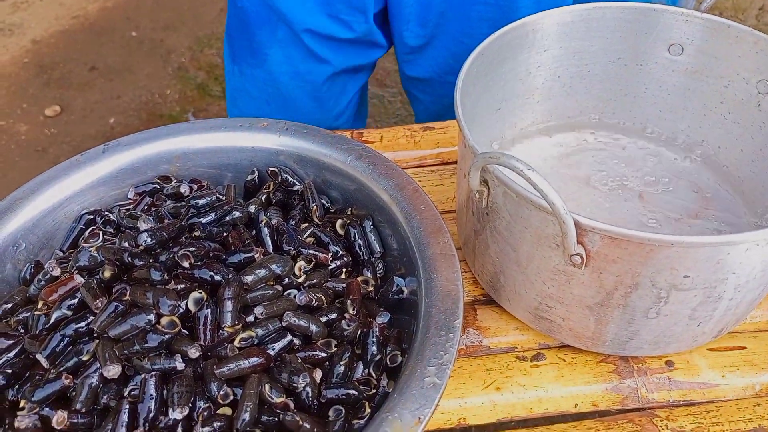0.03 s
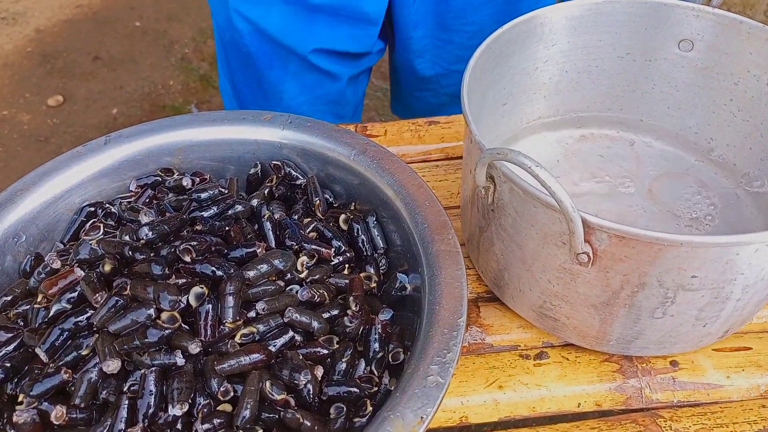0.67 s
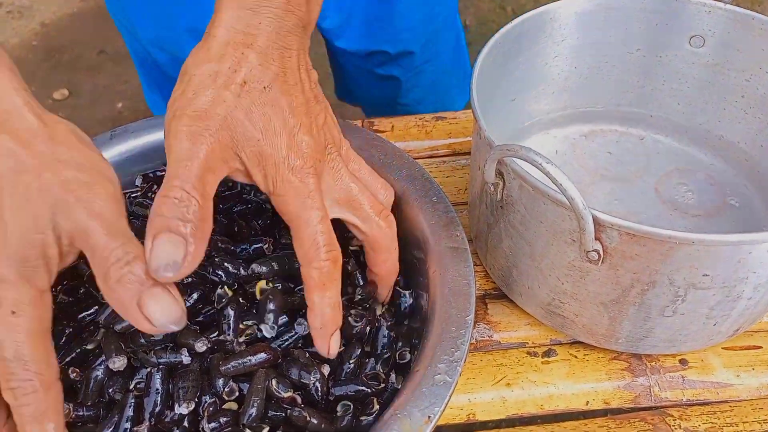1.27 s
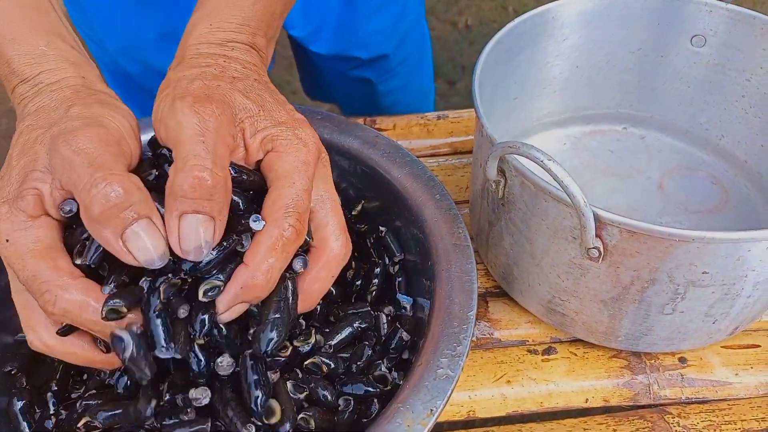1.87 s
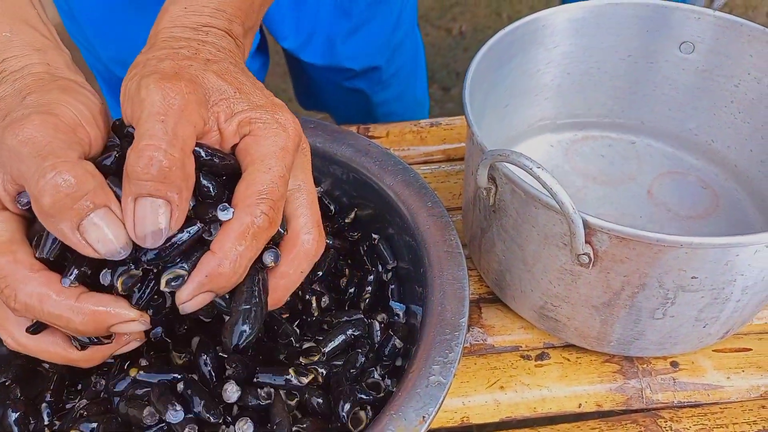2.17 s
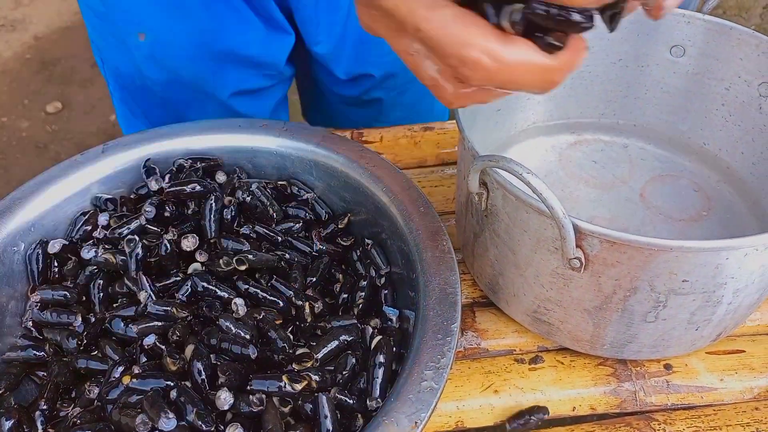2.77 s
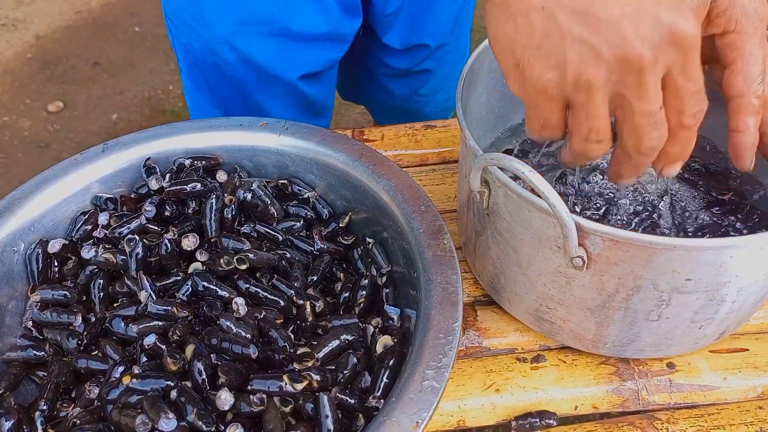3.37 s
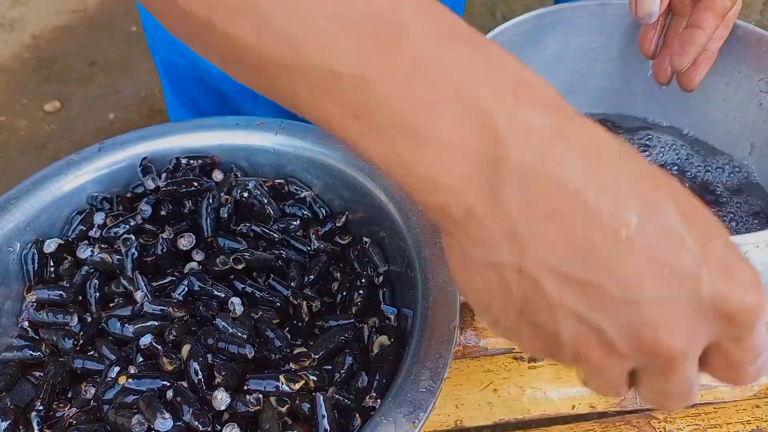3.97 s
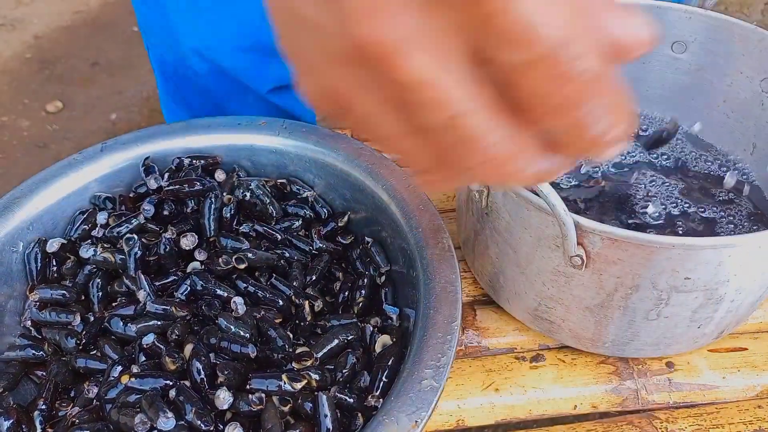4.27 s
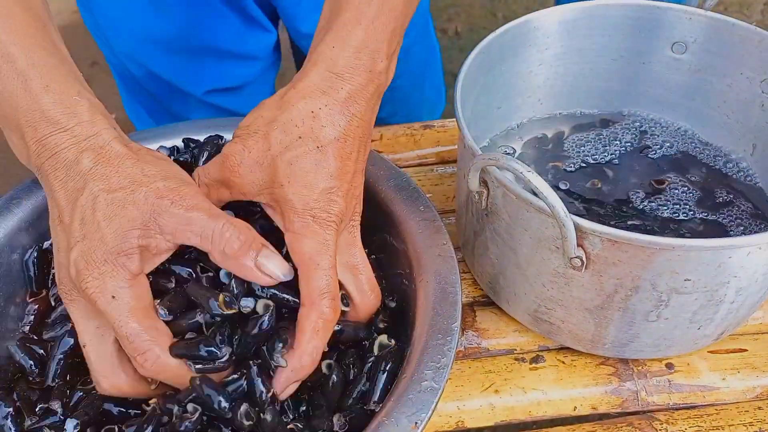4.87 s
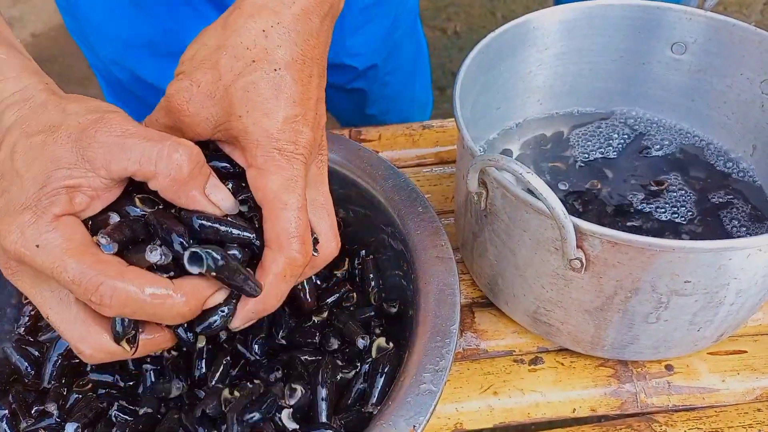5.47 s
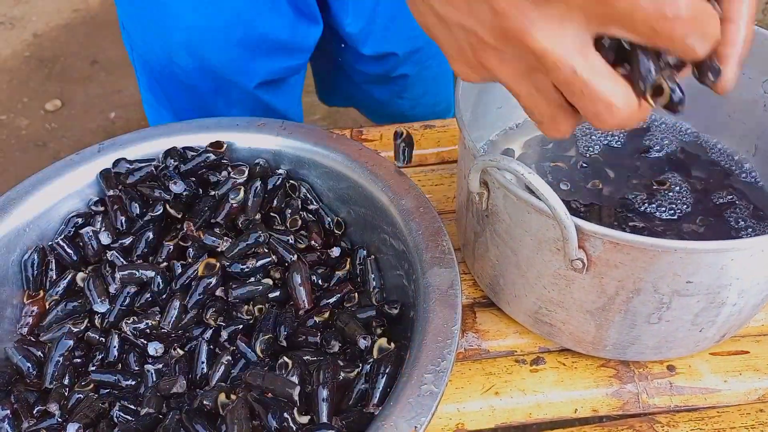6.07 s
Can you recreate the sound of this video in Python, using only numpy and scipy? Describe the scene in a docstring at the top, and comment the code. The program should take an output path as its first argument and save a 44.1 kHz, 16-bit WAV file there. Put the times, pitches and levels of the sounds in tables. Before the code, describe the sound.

Wet snail shells crunch and clink in a metal basin, then splash into a pot of water, while a chick peeps faintly.

```python
"""Scooping snail shells in a yard

Outdoors, one microphone close to a bamboo table. Two hands scoop wet snail shells out of a metal basin:
they grind, click and set its wall ringing. Dropped into a pot of water they slosh and plop; strays fall
back, and bumps make the hollow slats knock and rattle. Farther off a chick peeps, a hen clucks twice
and a bird whistles faintly over the low rumble of the yard."""
import sys
import numpy as np
from scipy import signal
from scipy.fft import rfft, irfft
from scipy.io import wavfile
from scipy.ndimage import uniform_filter1d, minimum_filter1d

SR = 44100
rng = np.random.default_rng(int(sys.argv[2]) if len(sys.argv) > 2 else 0)


def unload_audio(sound):
    """Save the sound as a 16-bit wav file, at the path given as the first command line argument."""
    columns = np.transpose(np.atleast_2d(sound))
    # keep every value between -1 and 1, then stretch to whole-number steps
    steps = np.round(np.clip(columns, -1, 1) * 32767)
    wavfile.write(sys.argv[1], SR, steps.astype(np.int16))


N = 270333
TIME = np.arange(N) / SR
HIT_TIME = TIME[:SR // 3]

# Levels in the tables are relative; each source adds its own gain.
# spectrum of the open yard (frequency [Hz], level [dB])
YARD_SPECTRUM = [(25, -12), (45, -2.5), (75, 6.5), (150, 1), (280, -12), (450, -15.5), (1300, -17.5),
                 (2700, -17.5), (4200, -23.5), (5900, -36.5), (7400, -25.5), (9000, -18), (10200, -32),
                 (15500, -43)]
# calls of the far bird (start [s], level [dB])
WHISTLES = [(0.099, -72), (0.607, -64), (3.92, -61.5)]
# course of one call (time from its start [s], pitch before transposing [Hz], level [dB])
WHISTLE_SHAPE = [(0.0, 4550, -18), (0.025, 4470, 6), (0.06, 5100, -6), (0.1, 5560, -5), (0.13, 6550, -20),
                 (0.17, 6950, -1), (0.22, 7040, -14)]
# the hen's clucks (time [s], length [s], middle pitch [Hz], level [dB])
CLUCKS = [(0.567, 0.04, 275, -39), (0.617, 0.03, 274.5, -35)]
# spectrum of her throat (frequency [Hz], level [dB])
THROAT = [(150, 10.5), (290, 9), (580, 1), (880, 1.5), (1400, -14), (3000, -24), (8000, -60)]
# the chick's peeps (time of the downward break [s], level [dB], held pitch [Hz])
PEEPS = [(0.28, -38.5, 4310), (0.599, -37.5, 4276), (0.912, -37.5, 4190), (2.551, -39.5, 4120),
         (3.895, -41.5, 3980), (4.22, -37.5, 4280), (5.596, -41, 4230), (5.928, -36.5, 4290)]
# course of one peep (time from the break [s], pitch over held pitch [ratio], level [dB])
PEEP_SHAPE = [(-0.075, 1.14, -26), (-0.05, 1.08, -15), (-0.034, 1.025, -1), (-0.012, 1.0, 0),
              (0.002, .95, -2), (0.012, .76, -3), (0.03, .6, -7), (0.042, .54, -26)]

# bumps on the table (time [s], knock [dB], hollow pop [dB], pitch of the struck tube [Hz], thud [dB])
BUMPS = [(0.035, -27.5, -12, 626, -39), (0.042, -21, -17.5, 406, -19), (0.099, -23.5, -19, 372, -22.5),
         (0.121, -23.5, -21, 280, -30), (0.162, -47, -18.5, 615, -22.5), (0.184, -29.5, -23.5, 332, -23.5),
         (0.229, -37, -46, 283, -25.5), (0.699, -69, -51, 276, -31.5), (3.779, -38, -40, 560, -29),
         (3.79, -21.5, -28, 368, -21.5), (3.801, -19.5, -20, 166, -22), (3.833, -41, -34, 314, -35)]
# modes of the hollow slats (frequency [Hz], level [dB], t60 [s])
SLAT_MODES = [(160, -22, 0.098), (278.5, 2, 0.24), (405, 8.5, 0.09), (580, 7, 0.057), (745, 12.5, 0.053),
              (800, 14, 0.082), (1220, -9, 0.061), (1990, 1, 0.081)]
# spectra of knocked bamboo, a scraped slat and a dull thud (frequency [Hz], level [dB])
BAMBOO = [(60, -1.5), (130, 8.5), (250, -9), (400, -13.5), (600, -23.5), (850, -0.5), (1000, 9.5),
          (1250, 9), (1700, 5), (2050, 6), (3200, -6), (4400, -13.5), (6000, -35), (12000, -35)]
SCRAPED_SLAT = [(150, -1.5), (320, -6.5), (550, -11), (800, -14), (940, 2), (1070, -3), (1300, -18),
                (1800, -15), (4000, -21.5), (8000, -39.5)]
THUD = [(25, -45), (50, -24), (80, -6), (115, 0), (190, -1), (350, -5), (600, -13), (1200, -35),
        (4000, -70), (16000, -90)]

# shells and drops hitting the water (time [s], slap [dB], spray [dB])
PLOPS = [(2.442, -38.5, -38.5), (2.864, -14, -22.5), (2.868, -14, -54), (2.898, -30, -60),
         (2.918, -26.5, -62), (3.099, -13.5, -25), (3.376, -21, -53), (3.401, -41, -27.5),
         (3.494, -27, -39), (3.533, -27, -66), (3.631, -31, -44), (3.653, -26, -34.5), (3.726, -35.5, -59),
         (4.099, -38.5, -46), (4.401, -11.5, -23), (4.416, -22.5, -26), (4.466, -39.5, -45)]
# surges in the pot: first shells, fingers, the handful, hands opening, hands leaving
# (start [s], rise [s], hold [s], fall [dB/s], level [dB])
SLOSHES = [(2.885, 0.021, 0.065, 400, -31.5), (3.016, 0.022, 0.004, 347, -27.5),
           (3.097, 0.019, 0.055, 134, -12), (3.284, 0.057, 0.013, 240, -18.5),
           (3.403, 0.034, 0.085, 79, -28)]
# modes of the pot (frequency [Hz], level [dB], t60 before damping [s])
POT_MODES = [(382, -20.5, 1), (770, -13.5, 0.49), (1400, -9, 0.28), (2310, 12, 0.12), (2380, 0, 0.059),
             (2570, -6, 0.093), (3030, -0.5, 0.48), (3400, -22, 0.083), (4570, -11, 0.34)]
# spectra of slapped water and fine spray (frequency [Hz], level [dB])
WATER = [(88, -1), (150, -13), (239, 2), (314, -7), (400, -53), (441, 0.5), (598, -3.5), (1140, 0),
         (1310, 0), (2540, 11), (4320, 4), (5410, -23), (7000, -2.5), (9100, -40), (15400, -120)]
SPRAY = [(3000, 1), (5600, 0), (7050, 6.5), (7900, 5.5), (9100, 12), (10500, -2), (13000, -6),
         (15500, -2.5)]

# heavy landings that jolt the table top (time [s], thud [dB], shell crack [dB])
JOLTS = [(1.739, -27.5, -19), (2.13, -27, -22), (2.754, -30.5, -25), (2.868, -29.5, -45),
         (3.121, -17.5, -29), (4.536, -31, -21), (5.822, -25.5, -16.5), (6.042, -35, -35)]
# the loudest shells striking the basin (time [s], low clank [dB], high ring [dB], shell click [dB])
CLINKS = [(1.102, -42.5, -39, -50), (1.122, -37, -29, -46), (1.159, -26.5, -24, -26.5),
          (1.192, -24.5, -39, -23), (1.216, -19.5, -17, -21), (1.621, -15, -27, -27),
          (1.665, -33, -30, -26), (1.8, -31.5, -34.5, -48), (2.031, -24.5, -23, -30),
          (2.132, -21, -19, -23), (2.172, -24.5, -32, -31), (2.184, -30, -27, -51),
          (2.202, -26.5, -51, -46), (2.241, -29.5, -30, -38), (2.291, -29, -34, -36),
          (2.334, -37.5, -33.5, -34.5), (2.761, -17, -22, -46), (2.767, -21, -21, -29),
          (2.797, -29.5, -28.5, -39), (4.508, -49, -53, -41), (4.526, -26, -23, -33),
          (4.547, -18.5, -20, -28), (4.572, -15, -35, -20.5), (4.778, -27, -44, -24),
          (4.856, -26, -50, -44), (4.922, -20, -41, -41), (4.988, -23, -22.5, -34),
          (5.093, -27.5, -51, -30.5), (5.129, -28.5, -38, -31.5), (5.244, -19, -21, -47),
          (5.408, -22.5, -31, -25.5), (5.549, -30.5, -44, -38), (5.615, -35.5, -57, -40.5),
          (5.978, -36.5, -38.5, -35), (6.042, -16.5, -15.5, -26), (6.12, -26.5, -24.5, -45)]
# hands dig in, close and lift, one list a scoop (time [s], push on the basin [dB], grinding [dB])
SCOOPS = [
    [(1.15, -28.5, -43), (1.4, -21.5, -27), (1.46, -26.5, -33.5), (1.51, -16.5, -22.5), (1.59, -19.5, -21),
     (1.63, -29, -38.5), (1.85, -37, -40.5), (2.04, -32, -33), (2.23, -39.5, -38.5), (2.34, -51, -58),
     (2.55, -47.5, -58)],
    [(4.505, -40, -31), (4.55, -23.5, -39), (4.635, -20.5, -20), (4.68, -26.5, -42), (4.75, -20.5, -25),
     (5.0, -23, -30.5), (5.09, -33.5, -41.5), (5.33, -33, -32), (5.42, -29, -26.5), (5.53, -34.5, -30.5),
     (5.59, -45, -62), (5.76, -51, -57)],
]
# modes of the metal basin (frequency [Hz], level [dB], undamped t60 [s])
BASIN_MODES = [(690, -17, .22), (1142, -11, .05), (1346, -11, .05), (1590, -5, .05), (1757, -2, .09),
               (1830, -5, .045), (2080, -7, .04), (3190, -12, .05), (3618, -10, .11), (3725, -4, .12),
               (3865, -5, .06), (3995, -5, .13), (4290, -18, .12), (5465, -27, .08), (5900, -28, .13),
               (7040, -26, .12), (8900, -22, .11)]
# spectra of the hollow heap and of shell gritting on shell (frequency [Hz], level [dB])
HEAP = [(60, -47), (200, -8), (450, -16.5), (800, -6), (1200, 2), (1750, 2.5), (2250, 5), (2750, -4.5),
        (3200, -3), (4200, -0.5), (5500, -12), (8000, -29)]
GRIT = [(2000, -9.5), (4500, -34.5), (5800, -8), (7050, 9.5), (7700, 3), (9100, 12), (10000, 1.5),
        (11000, -4.5), (13000, -9), (15500, -9)]


def from_db(db):
    """Decibels to gain."""
    return 10 ** (np.asarray(db) / 20)


def rms_one(x):
    """Scale to unit power."""
    return x / np.sqrt(np.mean(x ** 2) + 1e-20)


def steady(x, span_s=0.026):
    """Even out the slow level and keep the grain."""
    power = np.abs(uniform_filter1d(x ** 2, int(span_s * SR) + 1))
    return x / np.sqrt(power + 1e-4 * np.mean(x ** 2))


def add(out, s, sound):
    """Mix a sound in at a time."""
    start = int(np.clip(round(s * SR), 0, N - 1))
    out[start:start + len(sound)] += sound[:N - start]


def swell(start_s, rise_s, hold_s, fall_db_per_s):
    """An envelope of height 1: straight rise, hold, even decay."""
    age = TIME - start_s
    return np.clip(age / rise_s, 0, 1) * from_db(-fall_db_per_s * np.maximum(age - rise_s - hold_s, 0))


def colour(x, spectrum, size=4096):
    """Causal (minimum-phase) filter with the given spectrum."""
    hz, db = np.transpose(spectrum)
    gain = from_db(np.interp(np.log(np.fft.rfftfreq(size, 1 / SR) + 1), np.log(hz), db))
    cepstrum = irfft(np.log(gain))[:size // 2]
    cepstrum[1:] *= 2
    response = irfft(np.exp(rfft(cepstrum, size)))[:size // 2]
    return signal.oaconvolve(x, response)[:len(x)]


def ring(clicks, hz, t60):
    """A unit click sets a sine of height 1 ringing."""
    r, w = from_db(-60 / (t60 * SR)), 2 * np.pi * hz / SR
    return signal.lfilter([0, np.sin(w)], [1, -2 * r * np.cos(w), r * r], clicks + 1e-18)


def detuned(hz, spread):
    """A pitch that varies from hit to hit."""
    return hz * np.exp(spread * rng.standard_normal())


def burst(t60):
    """The dying chatter of one impact."""
    return rng.standard_normal(len(HIT_TIME)) * np.exp(-np.minimum(np.log(1000) * HIT_TIME / t60, 20))


def blow(sound, db):
    """Give an impact its level over the first hundredth of a second."""
    return from_db(db) * sound / np.sqrt(np.mean(sound[:SR // 100] ** 2) + 1e-20)


def contacts(per_s, spread_db):
    """Random clicks whose sizes scatter in level."""
    sizes = from_db(spread_db * np.minimum(rng.exponential(1, N), 4)) * rng.choice([-1, 1], N)
    return sizes * (rng.random(N) < per_s / SR)


def crackle(clicks):
    """Smear each click into a short puff of noise."""
    return signal.oaconvolve(clicks, burst(0.016)[:SR // 100])[:N] * rng.standard_normal(N)


def grains(clicks, low_hz, high_hz, cycles, count=16):
    """Deal clicks to small resonators of many sizes."""
    dealt = rng.integers(0, count, N)
    pitches = np.geomspace(low_hz, high_hz, count)
    return rms_one(sum(ring(clicks * (dealt == k), hz, cycles / hz) for k, hz in enumerate(pitches)))


def whistle(shape, pitch_scale, waver):
    """A near-pure tone that follows a shape with an unsteady pitch."""
    s, pitch, db = np.transpose(shape)
    t = np.arange(s[0], s[-1], 1 / SR)
    unsteady = 1 + waver * rms_one(uniform_filter1d(rng.standard_normal(len(t)), size=60))
    hz = pitch_scale * np.interp(t, s, pitch) * unsteady
    return from_db(np.interp(t, s, db)) * np.sin(2 * np.pi * np.cumsum(hz) / SR)


def echoes(x, t60, wet_db):
    """Dull, diffuse reflections from the yard reach the microphone after the direct sound."""
    tail = signal.lfilter([1], [1, -.55], burst(t60)) * (HIT_TIME > .006)
    return x + from_db(wet_db) * signal.oaconvolve(x, tail / np.linalg.norm(tail))[:N]


def yard(level_db=-48):
    """Distant rumble and a thin high hiss."""
    return from_db(level_db) * rms_one(colour(rng.standard_normal(N), YARD_SPECTRUM))


def far_bird(gain_db=-2.5):
    """Thin upward slurs from a distance."""
    out = np.zeros(N)
    for s, db in WHISTLES:
        add(out, s, from_db(gain_db + db) * whistle(WHISTLE_SHAPE, pitch_scale=0.96, waver=0.013))
    return out


def hen(gain_db=-2.5, sag=0.27, hoarseness=0.55):
    """Short, hoarse pulse trains sink in pitch and pass through the throat."""
    out = np.zeros(N)
    for s, length, hz, db in CLUCKS:
        along = np.linspace(0, 1, int(length * SR))
        cycles = np.cumsum(hz * (1 - sag * (along - .5))) / SR
        pulses = rms_one(np.diff(np.floor(cycles), prepend=0))
        voice = colour(pulses + hoarseness * rng.standard_normal(len(along)), THROAT)
        add(out, s, from_db(gain_db + db) * rms_one(voice * np.sin(np.pi * along)))
    return out


def chick(gain_db=-2.5):
    """Out in the yard, each peep sags, holds, then breaks downward and turns raspy."""
    out = np.zeros(N)
    from_break = np.arange(PEEP_SHAPE[0][0], PEEP_SHAPE[-1][0], 1 / SR)
    rasp = np.interp(from_break, [-.004, .01], [0, .035])
    for s, db, hz in PEEPS:
        add(out, s + from_break[0], from_db(gain_db + db) * whistle(PEEP_SHAPE, hz, waver=0.017 + rasp))
    return out


def thud(db, t60):
    """The table top takes the weight of a blow."""
    return blow(colour(burst(t60), THUD), db)


def dragged_shell(peak_s=3.915, peak_db=-27, rise_db_per_s=369, fall_db_per_s=294):
    """A stray shell scrapes over a slat and makes it sing briefly."""
    below_peak_db = np.maximum(rise_db_per_s * (peak_s - TIME), fall_db_per_s * (TIME - peak_s))
    scrape = steady(colour(contacts(per_s=580, spread_db=4), SCRAPED_SLAT))
    return from_db(peak_db - below_peak_db) * scrape


def bamboo_table(rattle_db=-6, rattle_t60=0.21, pop_cycles=7.5):
    """Bumped slats pop and knock, then rattle as they settle; one shell drags across them."""
    shakes = [from_db(db) * swell(s, 0.0067, 0, 60 / rattle_t60) for s, db, *_ in BUMPS]
    settling = np.sqrt(sum(shake ** 2 for shake in shakes))
    out = settling * from_db(rattle_db) * steady(colour(contacts(per_s=1100, spread_db=2.3), BAMBOO))
    out += dragged_shell()
    for s, knock_db, pop_db, tube_hz, thud_db in BUMPS:
        crack, touch = burst(.03), burst(.003)
        slats = sum(from_db(db) * ring(touch, detuned(hz, 0.013), t60) for hz, db, t60 in SLAT_MODES)
        knock = blow(colour(crack, BAMBOO), knock_db + 1.5) + blow(slats, knock_db - 0.5)
        cycles = tube_hz * HIT_TIME
        pop = np.minimum(cycles, 1) * from_db(-60 * cycles / pop_cycles) * np.sin(2 * np.pi * cycles)
        add(out, s, knock + blow(pop, pop_db) + thud(thud_db - 4, t60=0.12))
    return out


def plops(splash_t60=0.043, treble_damping=0.45, loaded_from_s=3.2, loaded_ring=0.43):
    """Each entry slaps the water, throws spray and rings the pot; water damps the high modes most."""
    out = np.zeros(N)
    lowest_hz = POT_MODES[0][0]
    for s, slap_db, spray_db in PLOPS:
        touch = burst(0.002)
        ring_share = loaded_ring if s > loaded_from_s else 1   # the handful lying in the pot damps it
        wall = sum(from_db(db) * ring(touch, hz, t60 * ring_share * (lowest_hz / hz) ** treble_damping)
                   for hz, db, t60 in POT_MODES)
        slap = blow(colour(burst(splash_t60), WATER), slap_db)
        spray = blow(colour(burst(splash_t60), SPRAY), spray_db)
        add(out, s, slap + spray + blow(wall, slap_db - 13))
    return out


def splashing(hard_slosh_db=-8, spray_power=1.7, rumble_power=7.5):
    """A handful tumbles in: bubbles ring over the slosh; hard surges throw spray and shake the pot."""
    slosh = sum(from_db(db) * swell(s, rise, hold, fall) for s, rise, hold, fall, db in SLOSHES)
    force = slosh / from_db(hard_slosh_db)
    drops = contacts(per_s=1500, spread_db=-2)
    fizz = crackle(drops)
    bubbles = steady(colour(grains(drops, 799, 4550, cycles=35), WATER))
    water = from_db(-7.5) * bubbles + from_db(-5.5) * steady(colour(fizz, WATER))
    spray = force ** spray_power * from_db(-4) * steady(colour(fizz, SPRAY))
    rumble = force ** rumble_power * from_db(-6) * steady(colour(fizz, THUD))
    shell_knocks = grains(contacts(per_s=1000, spread_db=2), 2460, 5000, cycles=57, count=12)
    clatter = force ** spray_power * from_db(-8.5) * steady(shell_knocks)
    return slosh * water + from_db(hard_slosh_db) * (spray + rumble + clatter)


def shell_click(crack_t60, shell_hz=8950, ring_t60=0.04):
    """One shell snaps, cracks and rings briefly at a pitch of its own."""
    hz = detuned(shell_hz, 0.059)
    tone = ring(burst(0.0016), hz, ring_t60)
    overtone = from_db(-18) * ring(burst(0.0009), hz * 1.3, ring_t60)
    crack = blow(colour(burst(crack_t60), GRIT), db=-1.5)
    snap = blow(colour(burst(0.0017), GRIT), db=-7)
    return blow(tone + overtone, db=-0.5) + crack + snap


def jolts(crack_t60=0.024):
    """A shell lands hard: a dry crack and clack over a thud of the table top."""
    out = np.zeros(N)
    for s, thud_db, crack_db in JOLTS:
        add(out, s, thud(thud_db, t60=0.026) + from_db(crack_db) * shell_click(crack_t60))
        add(out, s, blow(colour(burst(crack_t60), HEAP), crack_db - 11.5))
    return out


def basin_ring(low_hz, high_hz, ring_share):
    """The basin's modes in one range, struck anew; shells against the wall damp and detune them."""
    touch = burst(0.0028)
    return sum(from_db(db) * ring(touch, detuned(hz, 0.006), t60 * ring_share)
               for hz, db, t60 in BASIN_MODES if low_hz < hz < high_hz)


def loose_clinks(per_s=14, offsets_db=(-4, -15, -8), spread_db=2):
    """Lesser clinks fall at random through each scoop and follow the push; rows as in CLINKS."""
    rows = []
    for scoop in SCOOPS:
        s, push_db, _ = np.transpose(scoop)
        chance = rng.standard_normal((60, 4))
        gaps = (chance[:, 0] ** 2 + rng.exponential(1, len(chance))) / (2 * per_s)
        times = s[0] + np.cumsum(gaps)
        levels = np.interp(times, s, push_db)[:, None] + offsets_db + spread_db * chance[:, 1:]
        rows += list(np.column_stack([times, levels])[times < s[-1]])
    return rows


def clinks(split_hz=3000, knock_hz=1760):
    """A shell clicks against the basin, whose low and high modes answer to where it lands."""
    out = np.zeros(N)
    for s, clank_db, ring_db, click_db in list(CLINKS) + loose_clinks():
        # share of its free ringing time that the loaded basin keeps
        ring_share = np.clip(0.75 + 0.21 * rng.standard_normal(), .3, .9)
        crack_t60 = 0.064 * ring_share
        clank = blow(basin_ring(0, split_hz, ring_share), clank_db - 6.5)
        high_ring = blow(basin_ring(split_hz, SR, ring_share), ring_db + 1.5)
        # the struck spot of the wall gives a short, round knock
        knock = ring(burst(0.00067), detuned(knock_hz, 0.084), t60=0.056 * ring_share)
        clack = blow(knock, clank_db - 1) + blow(colour(burst(crack_t60), HEAP), clank_db - 4)
        add(out, s, clank + high_ring + clack + from_db(click_db) * shell_click(crack_t60))
    return out


def scoop_gain(column):
    """Gain in time from one level column of SCOOPS, silent between the scoops."""
    curves = [np.transpose(scoop) for scoop in SCOOPS]
    return sum(from_db(np.interp(TIME, c[0], c[column], left=-150, right=-150)) for c in curves)


def stick_slip(spread_db, span_s):
    """A gain that wanders as the heap sticks and gives way."""
    return from_db(spread_db * rms_one(uniform_filter1d(rng.standard_normal(N), int(span_s * SR) + 1)))


def scooping(squeeze_s=1.905, squeeze_width_s=0.012, wall_share=0.15, ring_share=0.45):
    """Shells slip over each other; a harder push makes more contacts, and the basin rings below."""
    # closing fingers squeeze the first handful into one bright crunch
    squeeze = np.exp(-.5 * ((TIME - squeeze_s) / squeeze_width_s) ** 2)
    push = scoop_gain(column=1) + from_db(-27) * squeeze
    grind = scoop_gain(column=2) + from_db(-25) * squeeze
    slips = contacts(per_s=1200 * (0.32 + np.sqrt(push / push.max())), spread_db=0.5)
    crunch = crackle(slips)
    # only some contacts reach the wall, and the pressed heap damps its ring
    on_wall = slips * (rng.random(N) < wall_share)
    metal = sum(from_db(db) * ring(on_wall * rng.standard_normal(N), hz, t60 * ring_share)
                for hz, db, t60 in BASIN_MODES)
    # hollow shells and the gaps between them knock at many pitches
    hollow = 0.34 * steady(grains(slips, 612.3, 3316, cycles=110, count=24)) + steady(crunch)
    body = from_db(-5) * steady(metal, span_s=0.26) + from_db(-2.5) * steady(colour(hollow, HEAP))
    # single shells snap free and tick at their own pitch
    snaps = contacts(per_s=90, spread_db=8.5)
    ticks = from_db(-2.5) * steady(grains(snaps, 8060, 10010, cycles=170), span_s=0.135)
    grit = from_db(-1.5) * steady(colour(crunch, GRIT))
    rub = from_db(-11) * rms_one(colour(rng.standard_normal(N), GRIT))
    push *= stick_slip(spread_db=2.44, span_s=0.012)
    grind *= stick_slip(spread_db=1.77, span_s=0.008)
    return push * body + grind * (ticks + grit + rub)


def scene():
    """Basin, table and pot stand close and dry; chick and far bird carry much more of the yard's echo."""
    basin = echoes(scooping() + clinks() + jolts(), t60=0.14, wet_db=-23.5)
    table = echoes(bamboo_table(), t60=0.18, wet_db=-12.5)
    pot = echoes(splashing() + plops(), t60=0.16, wet_db=-20.5)
    birds = echoes(chick(), t60=0.16, wet_db=0)
    birds += echoes(far_bird(), t60=0.29, wet_db=12)
    birds += echoes(hen(), t60=0.19, wet_db=-14)
    return (basin + table + pot + birds + yard())[None]


def record(dry, low_cut_hz=56, high_cut_hz=15700, ceiling=0.84, release_db_per_s=900):
    """The mono microphone drops the deep bass, a fast limiter holds the peaks, the top is cut."""
    mic = signal.sosfilt(signal.butter(3, low_cut_hz, "high", fs=SR, output="sos"), dry)
    over_db = np.maximum(20 * np.log10(np.abs(mic[0]) / ceiling + 1e-9), 0)
    held_db = np.maximum.accumulate(over_db + release_db_per_s * TIME) - release_db_per_s * TIME
    gain_db = uniform_filter1d(minimum_filter1d(-held_db, size=45), size=45)
    high_cut = signal.ellip(10, .1, 80, high_cut_hz, fs=SR, output="sos")
    return signal.sosfilt(high_cut, mic * from_db(gain_db))


dry = scene()
out = record(dry)
unload_audio(out)
```